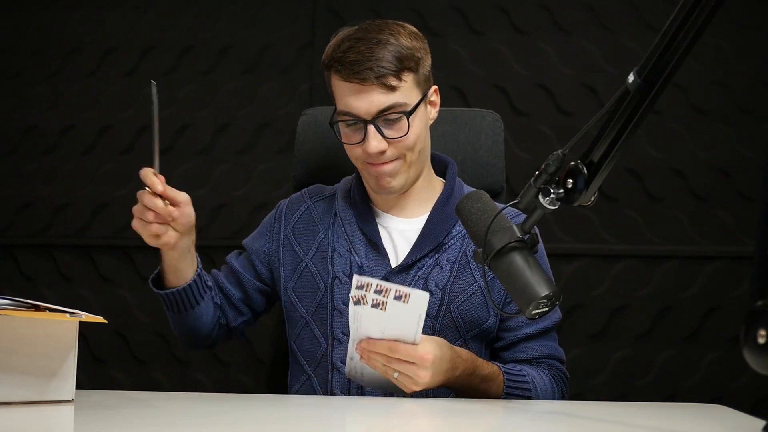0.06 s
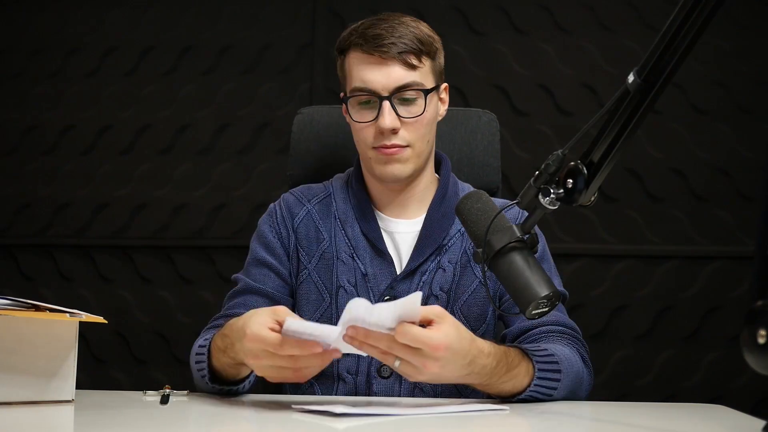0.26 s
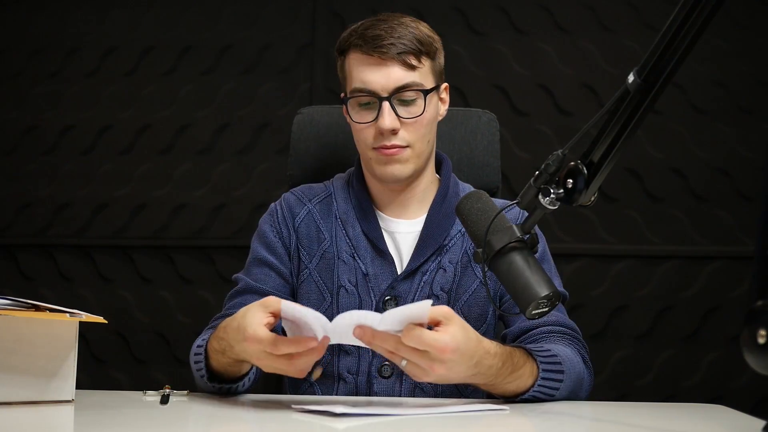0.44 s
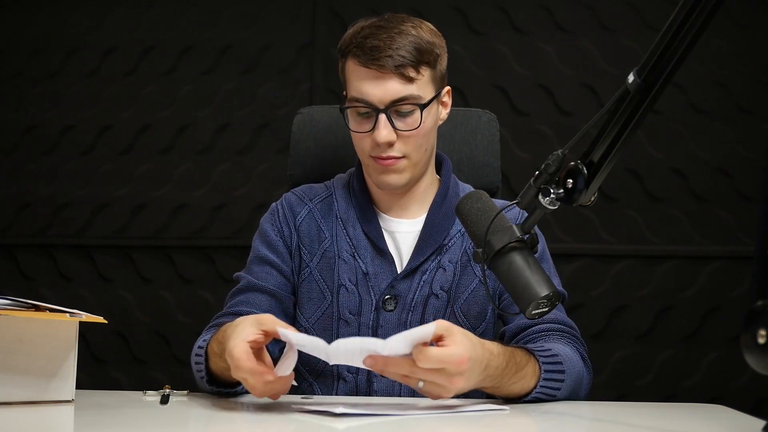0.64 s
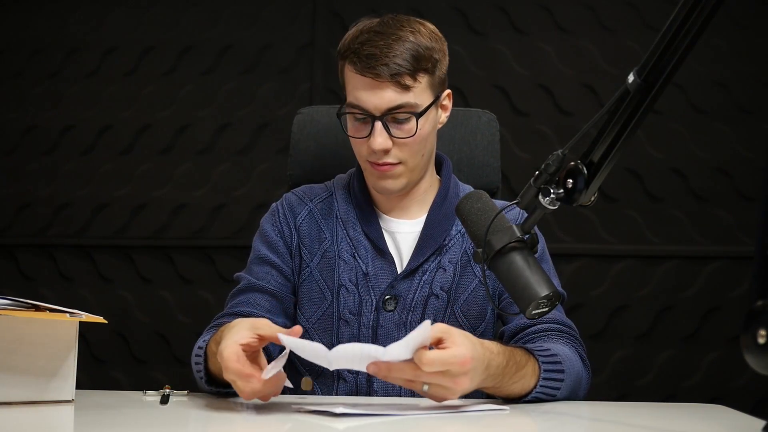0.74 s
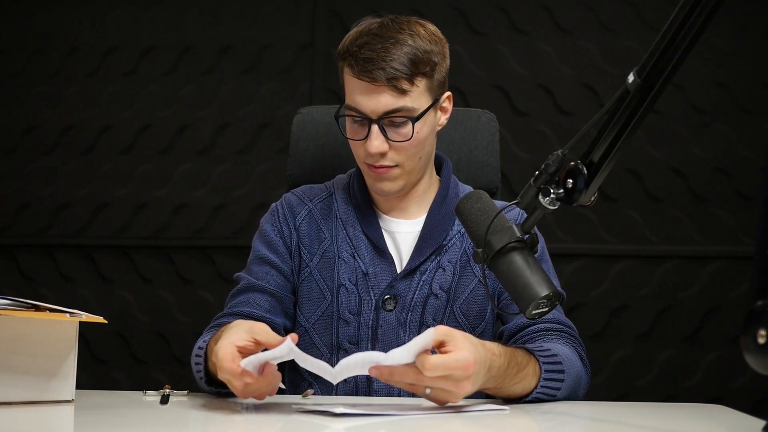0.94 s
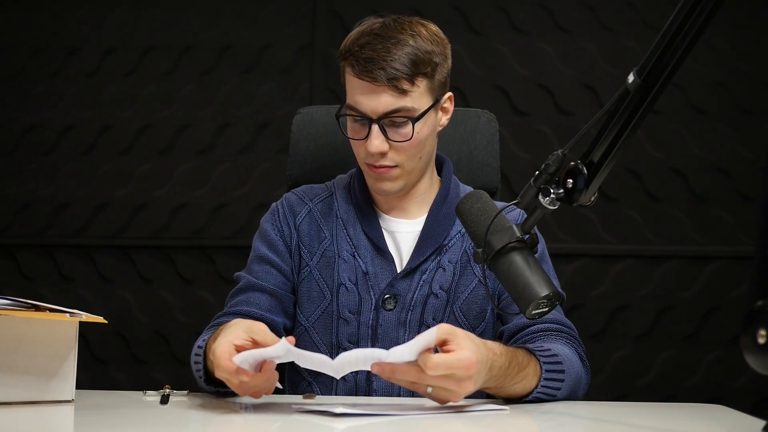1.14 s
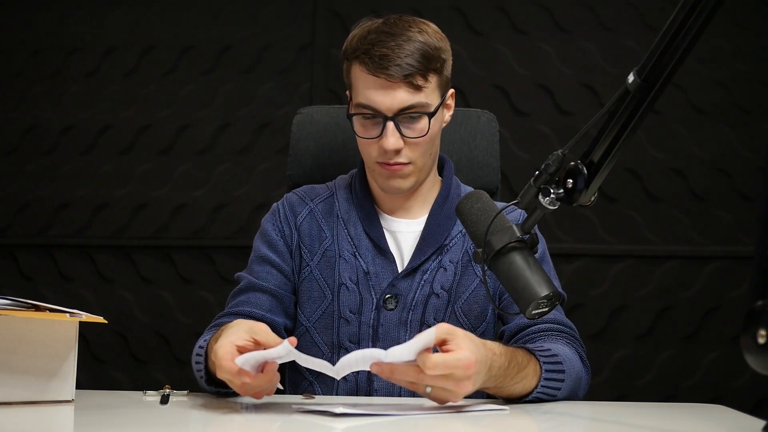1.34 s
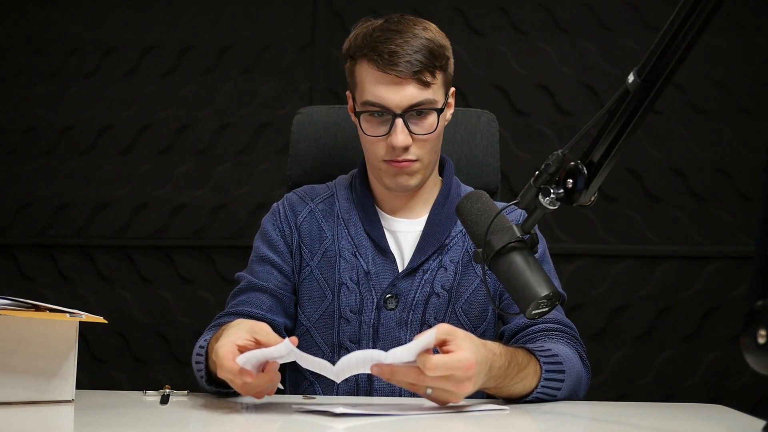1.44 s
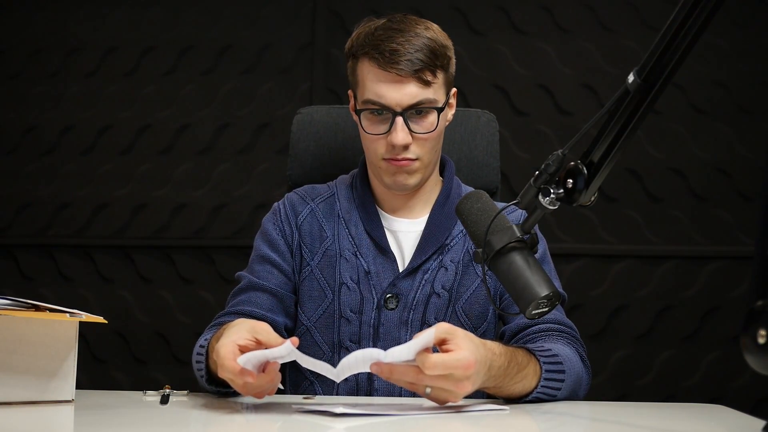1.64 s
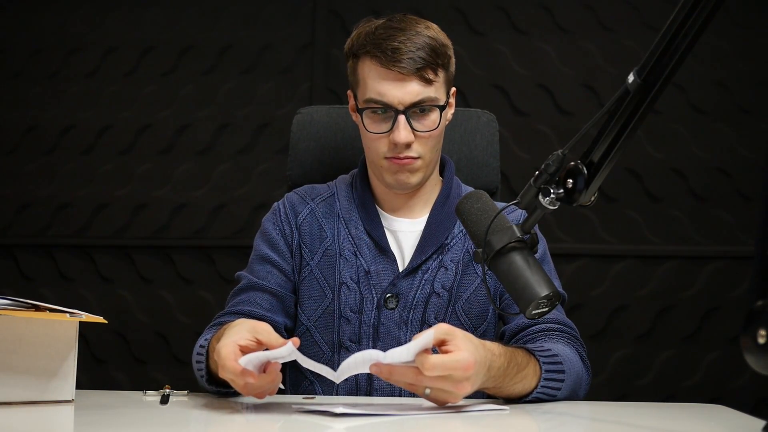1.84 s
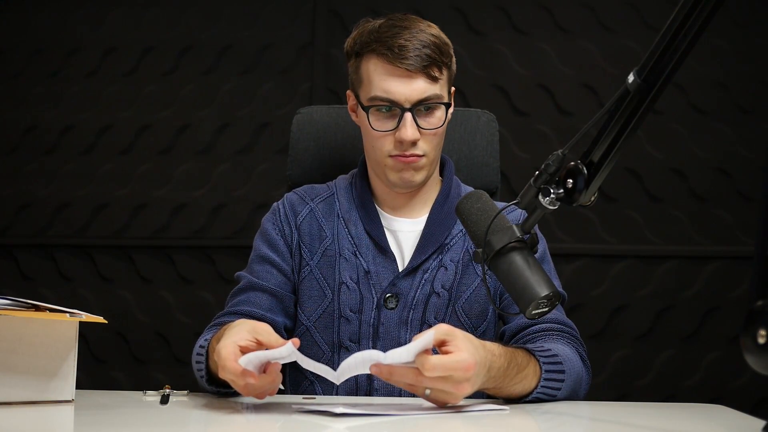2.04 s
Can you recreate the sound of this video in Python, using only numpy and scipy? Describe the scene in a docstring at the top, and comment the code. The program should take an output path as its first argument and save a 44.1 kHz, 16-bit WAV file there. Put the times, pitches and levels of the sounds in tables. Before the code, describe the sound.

A small coin hits a desk with sharp bright clicks after brief paper crackling, bounces several times, then wobbles on its rim in a quickening whirr; quiet damped studio, close microphone with faint low thumps.

```python
"""A man opens an envelope at a desk in a damped studio, over a quiet room tone: filtered noise
bursts crack as creases and fine noise grains rustle. From 0.28 s desk modes ring out and the
microphone arm booms low, as decaying sines. From 0.57 s a small coin slides out, bounces and chatters:
each contact is a tick that excites the desk and room, and the coin sings on a close pair of modes.
From 1.0 s it wobbles on its rim, a train of ticks and grinding noise that swells once a turn."""
import sys
import numpy as np
from scipy import signal
from scipy.fft import rfft, irfft
from scipy.io import wavfile

SR = 44100
rng = np.random.default_rng(int(sys.argv[2]) if len(sys.argv) > 2 else 0)


def decibels_to_gain(level_db):
    """Convert a level in decibels to a linear amplitude gain (20 dB per decade)."""
    exponent = np.asarray(level_db, float) / 20
    return 10 ** exponent


def store_wav(level_fs):
    """Save 16-bit WAV to argv[1]."""
    pcm = np.round(np.clip(np.atleast_2d(level_fs), -1, 1) * 32767)
    wavfile.write(sys.argv[1], SR, pcm.T.astype(np.int16))


N = 92080


def unit(x):
    """Normalisation: scale to rms 1."""
    return x / np.sqrt(np.mean(x ** 2))


def curve(table, col=1):
    """Envelope: linear interpolation of a column of a time table, one value per sample."""
    rows = np.array(table)
    return np.interp(np.arange(N) / SR, rows[:, 0], rows[:, col])


def at_pitch(hz, table):
    """Spectral curve: interpolation of a (f/Hz, value) table along log frequency."""
    rows = np.array(table)
    return np.interp(np.log(hz), np.log(rows[:, 0]), rows[:, 1])


def shade(x, table):
    """Linear filtering: weight the spectrum of a noise by (f/Hz, level/dB) points."""
    hz = np.maximum(np.fft.rfftfreq(len(x), 1 / SR), 1)
    return irfft(rfft(x) * decibels_to_gain(at_pitch(hz, table)), len(x))


def butter(x, hz, kind):
    """Second-order Butterworth filtering, low-pass, high-pass or band-pass."""
    return signal.sosfilt(signal.butter(2, hz, kind, fs=SR, output="sos"), x)


def add(out, s, x):
    """Superposition: mix x into out from time s."""
    i = max(int(s * SR), 0)
    out[i:i + len(x)] += x[:N - i]


# spectrum of the quiet room: f/Hz, relative level per Hz/dB
ROOM_TONE = [(12, 11), (45, -3.5), (80, -18.5), (120, -5), (200, -23), (500, -46), (1500, -27), (6000, -39),
             (15000, -42)]


def room_tone():
    """Stationary noise: a Gaussian process with the spectral density of the quiet room."""
    return decibels_to_gain(-63) * unit(shade(rng.standard_normal(N), ROOM_TONE))


ROOM_RISE_S = 0.0038  # time constant of the onset
# reverberation time of the room: f/Hz, t60/s
ROOM_T60 = [(200, 0.72), (530, 0.16), (1400, 0.25), (3700, 0.15), (9000, 0.1), (15000, 0.17)]


def tail(colour):
    """Diffuse reverberation: the room's impulse response, each band decaying at its own rate; energy 1."""
    t, out = np.arange(SR // 2) / SR, 0
    for hz in 150 * 2 ** np.arange(0, 7, .5):
        edges = [hz / 2 ** .25, min(hz * 2 ** .25, .45 * SR)]
        band = butter(shade(rng.standard_normal(len(t)), colour), edges, "band")
        t60 = at_pitch(hz, ROOM_T60)
        out = out + band * decibels_to_gain(-60 * t / t60) / np.sqrt(t60)
    out = out * (1 - np.exp(-t / ROOM_RISE_S))
    return out / np.sqrt(np.sum(out ** 2))


CREASE_TOP_HZ, CRACK_DB = 7000, -22  # low-pass corner; unfiltered grains mixed into the burst
THUD_HZ, THUD_T60_S = 86, 0.046
# paper creases snapping: t/s, relative level/dB, colour f/Hz, decay time constant/s, thud level/dB
CREASES = [(.001, -26, 1350, 0.012, -29), (.002, -34, 8400, 0.017, -66), (.003, -23, 470, 0.016, -51),
           (0.17, -41, 465, 0.016, -59), (0.184, -51, 1070, 0.0091, -74),
           (0.2368, -30.5, 990, 0.00076, -58), (.237, -30.5, 2110, 0.00076, -78),
           (.2372, -37, 4470, 0.00082, -80), (0.243, -47, 1280, .002, -78),
           (0.2758, -26, 1160, 0.0017, -47.5), (0.277, -44, 6500, 0.00053, -78),
           (0.281, -31.5, 1200, 0.013, -74), (.3207, -47, 5500, 0.0029, -72),
           (0.343, -39.5, 2200, 0.002, -46), (.421, -37, 4230, 0.0061, -55),
           (0.4453, -20, 1130, 0.01, -36.5), (.446, -28.5, 4400, 0.0088, -65),
           (0.4547, -23.5, 1320, 0.01, -37), (0.495, -38, 1950, 0.016, -50)]


def creases():
    """Impulsive excitation of a resonance: irregular grains ring a crease's colour, over a decaying thud."""
    snaps, thuds = np.zeros(N), np.zeros(N)
    t = np.arange(4000) / SR
    for s, db, hz, length, thud_db in CREASES:
        uneven = decibels_to_gain(5.14 * rng.standard_normal(4000))
        grains = rng.standard_normal(4000) * uneven * np.exp(-t / length)
        grains[0] = 5  # the first crack
        burst = signal.lfilter(*signal.iirpeak(hz, 1.8, fs=SR), grains) + decibels_to_gain(CRACK_DB) * grains
        add(snaps, s, decibels_to_gain(db) * burst)
        add(thuds, s, -decibels_to_gain(thud_db - 60 * t / THUD_T60_S) * np.sin(2 * np.pi * THUD_HZ * t))
    snaps = butter(snaps, CREASE_TOP_HZ, "low")
    echo = signal.fftconvolve(snaps, tail([(200, 0.0042), (15000, 0.006)]))[:N]  # nearly flat colour
    return snaps + thuds + decibels_to_gain(-10.5) * echo


# paper sliding under the fingers: t/s, level/dB
RUSTLE = [(.1, -72), (.23, -69.5), (.3, -69), (.37, -56), (.41, -59), (.44, -47), (.52, -57.5), (.57, -64)]
# spectrum of the sliding paper: f/Hz, relative level per Hz/dB
PAPER = [(120, -2), (300, -5.5), (1200, -7), (2500, -13), (6000, -15.5), (10000, -23.5), (15000, -38)]


def rustle():
    """Friction noise: fine grains of uneven strength, coloured by the sheet."""
    strength_db = 2.7 * np.repeat(rng.standard_normal(N // 100 + 1), 100)[:N]  # one per 100 samples
    grain = rng.standard_normal(N) * decibels_to_gain(strength_db)
    sliding = np.arange(N) < RUSTLE[-1][0] * SR
    return unit(shade(grain, PAPER)) * decibels_to_gain(curve(RUSTLE)) * sliding


# modes of the desk top: f/Hz, bandwidth/Hz, relative level/dB
DESK = [(281, 49, -18.5), (457, 68, -14.5), (537, 16.4, -8.5), (822, 11, -12), (1143, 28.4, 0.5),
        (1285, 25, -16), (1451, 20, -1), (1555, 26, -3.5), (1714, 11, -7), (1941, 50, 1.5),
        (2434, 44, -2.5), (2968, 25, -2), (3760, 340, -2), (4720, 480, 0.5), (6500, 200, 0)]
# where a blow lands, one desk mode rings out above the others: t/s, nearby mode f/Hz, relative level/dB
SPOTS = [(.279, 1285, -37), (.445, 822, -37.5), (.449, 1150, -39), (.446, 457, -33), (0.575, 535, -40),
         (.744, 1150, -33)]


def spots():
    """Selective modal excitation: each landing place favours one desk mode."""
    t, out = np.arange(SR // 4) / SR, np.zeros(N)
    for s, near_hz, db in SPOTS:
        hz, width, _ = min(DESK, key=lambda mode: abs(mode[0] - near_hz))
        envelope = (1 - np.exp(-t / ROOM_RISE_S)) * np.exp(-np.pi * width * t)
        add(out, s, decibels_to_gain(db) * envelope * np.sin(2 * np.pi * hz * t))
    return out


ARM_RISE_S = 0.018  # time constant of the onset
# thumps that reach the microphone arm through the desk: t/s, relative level/dB
THUMPS = [(0.291, -51.5), (0.371, -62.5), (0.453, -53), (0.588, -46.5), (0.756, -45), (0.896, -53.5),
          (.97, -56.5), (1.101, -64.5)]
# modes of the arm: f/Hz, relative level/dB, t60/s
ARM_MODES = [(45.4, 17.5, 0.18), (13.12, 0.5, 1.29), (122.9, -12, 0.77)]


def arm():
    """Structure-borne vibration: each thump sets the arm's damped modes swinging, with a slow onset."""
    t, out = np.arange(SR // 2) / SR, np.zeros(N)
    rise = (1 - np.exp(-t / ARM_RISE_S)) ** 2
    for s, db in THUMPS:
        for hz, mode_db, t60 in ARM_MODES:
            add(out, s, -decibels_to_gain(db + mode_db - 60 * t / t60) * rise * np.sin(2 * np.pi * hz * t))
    return out


def tick(hz, cycles=1.13, smear_s=0.0018, smear_db=-14):
    """Impulse response of a low-Q resonance: a pull-first click with a brief scatter, peak near 1."""
    t = np.arange(400) / SR
    push = decibels_to_gain(smear_db) * rng.standard_normal(400) * np.exp(-t / smear_s) * (t > 1 / hz)
    push[0] = -1
    peak = signal.iirpeak(hz, cycles, fs=SR)  # cycles is the Q
    out = signal.lfilter(*peak, signal.lfilter(*peak, push))
    return out / np.abs(out[:12]).max()


# rim strikes: t/s, tick level/dB, desk drive level/dB, tick colour f/Hz
STRIKES = [(0.5714, -22.5, -12, 7000), (0.5751, -15.5, -8.5, 11500), (0.579, -19, -7.5, 7000),
           (.5829, -22.5, -15.5, 11900), (0.663, -64, -22, 6800), (0.688, -65, -28, 4000),
           (.741, -23.5, -23, 11000), (0.7447, -21, -8.5, 8600), (0.75, -19, -31, 11900),
           (0.8243, -23, -16, 5100), (.853, -30, -17, 4800), (0.8819, -21.5, -9.5, 7600),
           (0.8844, -20, -11.5, 10900), (0.886, -19, -17.5, 7000), (.976, -25, -16, 7000),
           (0.9869, -22.5, -14.5, 11100), (0.9945, -26, -41, 11500), (1.0042, -26, -19.5, 8000),
           (1.039, -32.5, -21, 7000), (1.0717, -30.5, -21, 9800), (1.0788, -35, -40, 12000),
           (1.085, -24, -20, 7000), (1.0895, -43, -44, 12000), (1.0939, -33, -33, 11770),
           (1.101, -48, -43, 13400), (1.108, -30, -30, 9600), (1.127, -32, -28.5, 11500),
           (1.1523, -44, -37, 9500), (1.1575, -34, -29, 7000), (1.162, -32, -25.5, 8300),
           (1.169, -32, -57, 10000), (1.174, -37, -27.5, 11500), (1.1825, -40, -50, 13570),
           (1.195, -38, -46, 8450), (1.206, -41, -30.5, 7000), (1.2164, -34.5, -33, 8500)]


def strikes():
    """Impact excitation: each contact gives a dry tick and an impulse into the desk."""
    ticks, blows = np.zeros(N), np.zeros(N)
    for s, db, desk_db, hz in STRIKES:
        add(ticks, s, decibels_to_gain(db) * tick(hz))
        blows[int(s * SR)] += decibels_to_gain(desk_db)
    return ticks, blows


PLACE_SCATTER_DB = 2.5  # spread of mode levels from place to place
# colour of the room's answer to a desk blow: f/Hz, relative level per Hz/dB
DESK_COLOUR = [(90, -14), (250, -8), (540, -10.5), (680, -6.5), (1150, 0.5), (1940, 1), (4500, -0.5),
               (7000, -5), (9000, -18), (12000, -16), (16000, -33)]


def desk():
    """Modal superposition: one blow leaves damped desk modes and a room tail of equal energy."""
    t, modes = np.arange(SR // 2) / SR, 0
    for hz, width, db in DESK:
        level = decibels_to_gain(db + PLACE_SCATTER_DB * rng.standard_normal()) * np.sqrt(width)
        phase = rng.uniform(0, 2 * np.pi)
        modes = modes + level * np.sin(2 * np.pi * hz * t + phase) * np.exp(-np.pi * width * t)
    return tail(DESK_COLOUR) + modes / np.sqrt(np.sum(modes ** 2))


PAIR_SCATTER_DB = 2.5  # spread of each mode's share after a strike
RIM_RING_DB, RIM_RING_T60_S = -16, .07
# how loudly the tumbling coin sings toward the microphone: t/s, level/dB
SINGING = [(0.583, -39), (0.613, -53.5), (0.629, -47.5), (0.647, -51), (0.669, -50.5), (0.719, -54.5),
           (0.747, -52), (0.797, -56.5), (0.881, -56.5), (0.945, -46), (0.975, -57), (0.997, -45.5),
           (1.015, -49.5), (1.235, -65), (1.277, -74), (1.313, -48), (1.34, -68)]
# close pair of coin modes: f/Hz, relative level/dB
COIN_MODES = [(9762, -6), (9828, -3)]


def song(touches):
    """Beating of two modes: free, rephased and rebalanced by each strike; damped when rung by the rim."""
    t, free, rolled = np.arange(N) / SR, 0, 0
    kicks = (np.array(STRIKES)[:, 0] * SR).astype(int)
    for hz, db in COIN_MODES:
        jumps = np.zeros(N)
        jumps[kicks] = rng.uniform(-np.pi, np.pi, len(kicks))
        strikes_so_far = np.cumsum(jumps != 0)
        share_db = PAIR_SCATTER_DB * rng.standard_normal(len(kicks) + 1)[strikes_so_far]
        free = free + decibels_to_gain(db + share_db) * np.sin(2 * np.pi * hz * t + np.cumsum(jumps))
        rolled = rolled + decibels_to_gain(db - 60 * t / RIM_RING_T60_S) * np.sin(2 * np.pi * hz * t)
    fade_in = np.clip((t - SINGING[0][0]) / 0.0032, 0, 1)
    fade_out = np.clip((SINGING[-1][0] - t) / 0.064, 0, 1)
    flight = unit(free) * decibels_to_gain(curve(SINGING)) * fade_in * fade_out
    return flight + decibels_to_gain(RIM_RING_DB) * signal.fftconvolve(touches, rolled)[:N]


WOBBLE_PEAK_S, WOBBLE_HZ, WOBBLE_HZ_PER_S = 1.3, 15.3, 8.4  # a swell crest, turn rate there, its growth
WOBBLE_SWELL_DB = 4  # either way about the table level
RIM_TICK_HZ, RIM_TICK_DB = 150.5, -10  # approximate nick rate; nick level relative to 10 x pressure
NICK_SCATTER_DB, NICK_JITTER = 2, .1  # spread of levels and of log intervals
# wobble on the rim: t/s, contact pressure level/dB before the swell, brightness level/dB
WOBBLE = [(1.0, -63, -3), (1.1, -52.5, 3), (1.22, -57, 5.5), (1.29, -55.5, 2), (1.4, -58.5, -4.5),
          (1.5, -54, -1.5), (1.68, -58, -2), (1.745, -54, -6), (1.78, -54.5, 10), (1.83, -56, 1.5),
          (2.085, -56, 4)]


def wobble():
    """Rolling contact: the rim turns ever faster, its nicks tick and its pressure swells once a turn."""
    t = np.arange(N) / SR
    u = t - WOBBLE_PEAK_S
    turns = WOBBLE_HZ * u + WOBBLE_HZ_PER_S * u ** 2 / 2
    fade_in = np.clip((t - WOBBLE[0][0]) / 0.058, 0, 1)
    press = decibels_to_gain(curve(WOBBLE) + WOBBLE_SWELL_DB * np.cos(2 * np.pi * turns)) * fade_in
    time_chance, level_chance = rng.standard_normal((2, 400))
    at = (np.cumsum(np.exp(NICK_JITTER * time_chance)) * SR / RIM_TICK_HZ).astype(int)
    inside = at < N
    nicks = np.zeros(N)
    nicks[at[inside]] = 10 * decibels_to_gain(RIM_TICK_DB + NICK_SCATTER_DB * level_chance[inside])
    return press * nicks, press


RIM_FIZZ_DB, RIM_GRIND_DB = -17, -3.5  # noise relative to pressure, into the ticks and into the desk
RIM_COLOUR_HZ, RIM_LOW_DB, RIM_HIGH_HZ = 7000, -1.5, 10800  # low colour, its level, high colour
NICK_SHARPNESS, NICK_SMEAR_S = 2.6, .0006  # Q, scatter time constant
DESK_BOTTOM_HZ = 168  # high-pass corner


def coin(count=8):
    """Source and response: contacts sound dry, drive varied answers of desk and room, and ring the coin."""
    ticks, blows = strikes()
    nicks, press = wobble()
    touch = nicks + decibels_to_gain(RIM_FIZZ_DB) * press * rng.standard_normal(N)
    bright = touch * decibels_to_gain(curve(WOBBLE, col=2))
    low_push = decibels_to_gain(RIM_LOW_DB) * touch * rng.uniform(0, 1, N)
    high_push = bright * rng.uniform(0.13, 1, N)
    for push, hz in ((low_push, RIM_COLOUR_HZ), (high_push, RIM_HIGH_HZ)):
        ticks += np.convolve(push, tick(hz, NICK_SHARPNESS, NICK_SMEAR_S))[:N]
    grind = decibels_to_gain(RIM_GRIND_DB) * press * rng.standard_normal(N)
    drive = blows + nicks + grind
    place = rng.integers(0, count, N)  # each sample lands at one of a few places
    body = sum(signal.fftconvolve(drive * (place == k), desk())[:N] for k in range(count))
    body = butter(body, DESK_BOTTOM_HZ, "high")
    return ticks + body + song(bright * rng.choice([-1., 1.], N))


def scene():
    """Superposition of room tone, paper, desk modes, arm and coin."""
    return (room_tone() + creases() + rustle() + spots() + arm() + coin())[None]


def low_pass(x):
    """Removes everything above the highest recorded frequency."""
    return signal.sosfilt(signal.butter(12, 16800, fs=SR, output="sos"), x)


def record(dry):
    """Band limitation: a steep low-pass reaches 30 dB of attenuation at 16.3 kHz."""
    soft = signal.sosfilt(signal.cheby2(10, 30, 16300, fs=SR, output="sos"), dry)
    return low_pass(soft)


dry = scene()
out = record(dry)
store_wav(out)
```